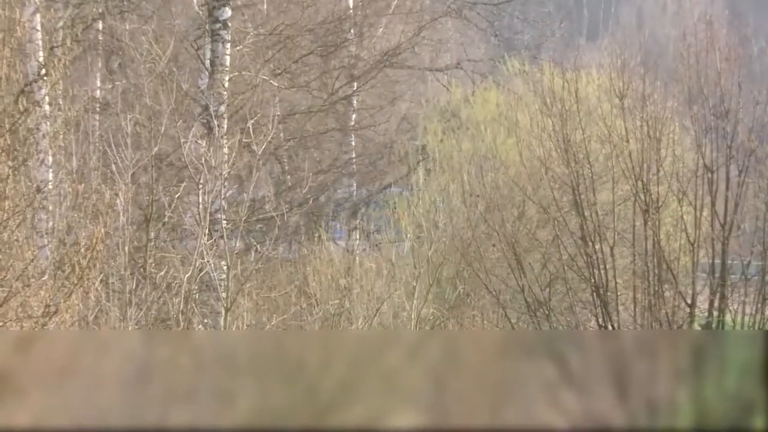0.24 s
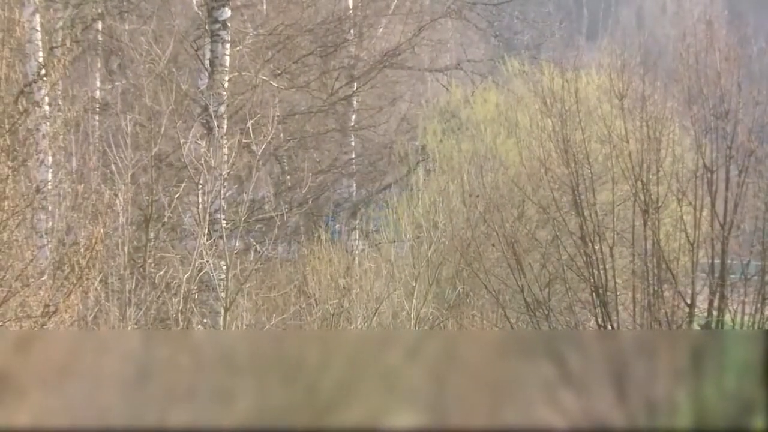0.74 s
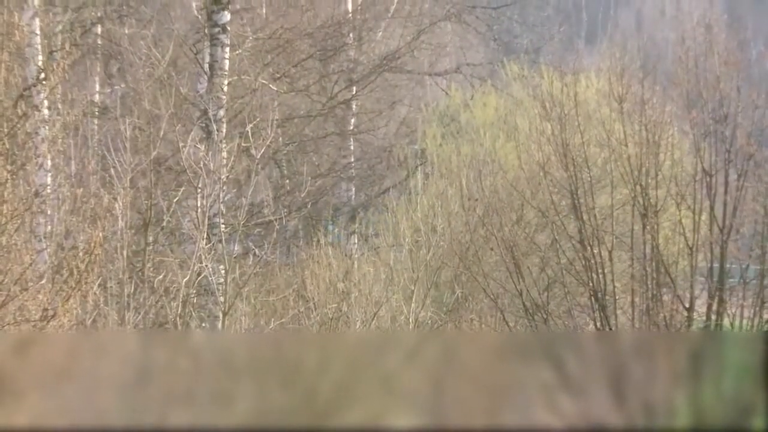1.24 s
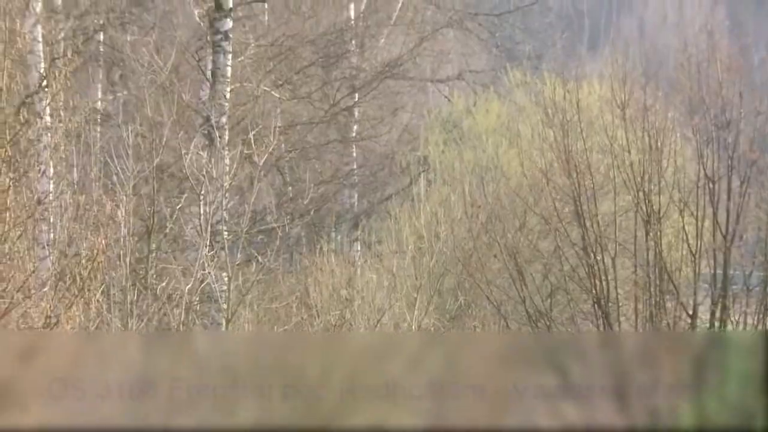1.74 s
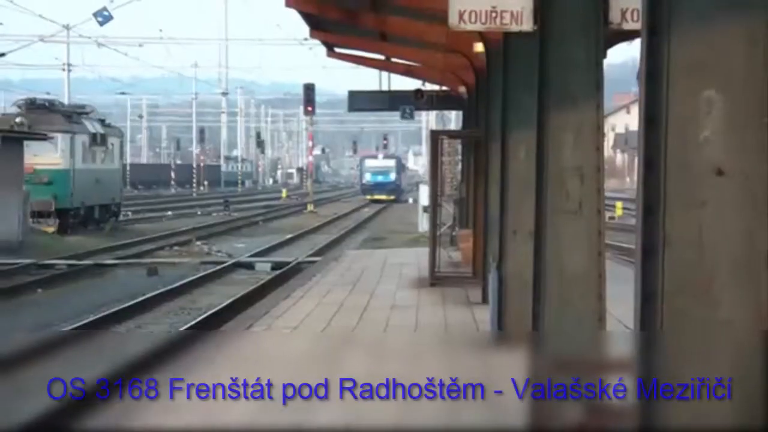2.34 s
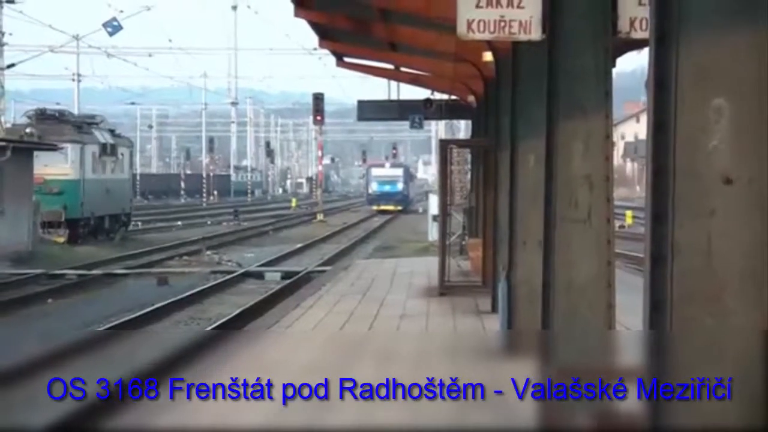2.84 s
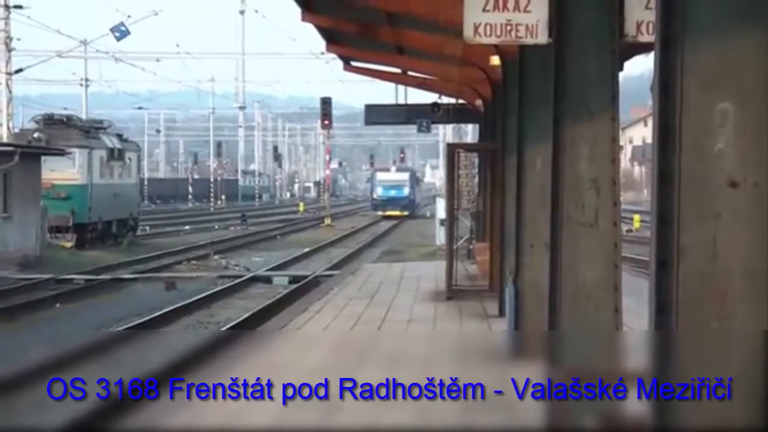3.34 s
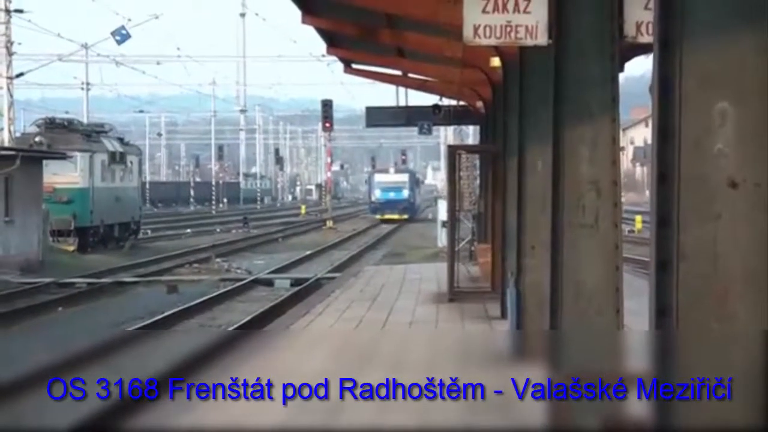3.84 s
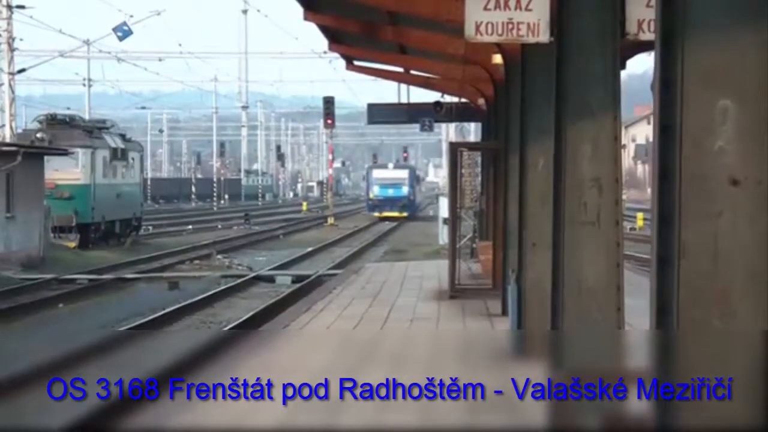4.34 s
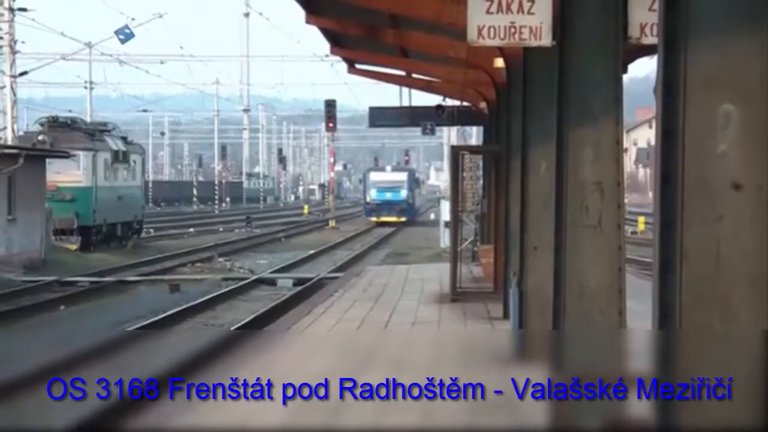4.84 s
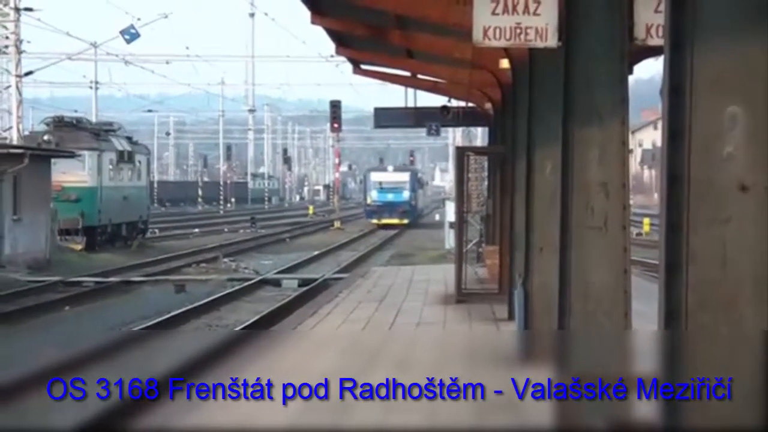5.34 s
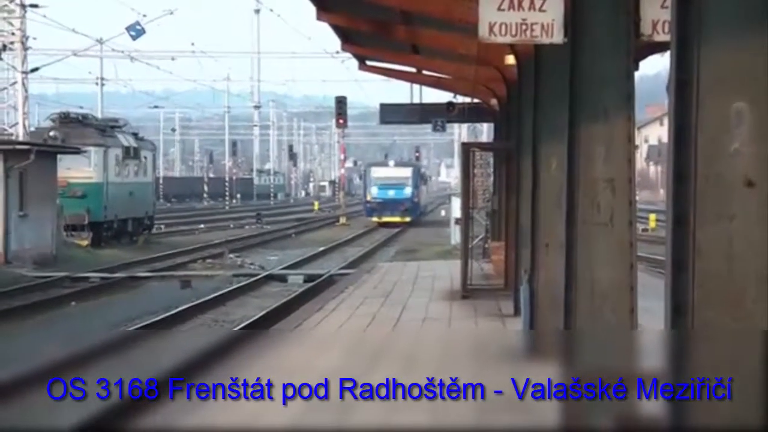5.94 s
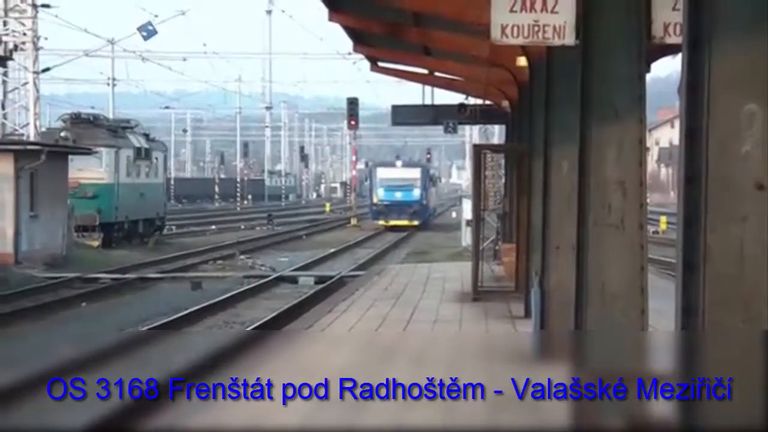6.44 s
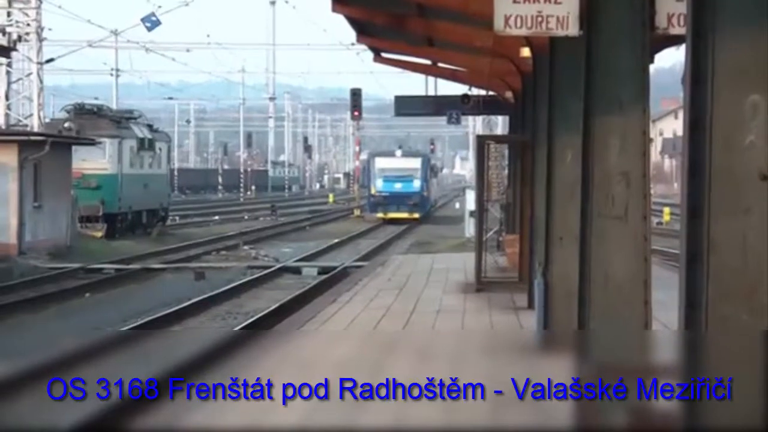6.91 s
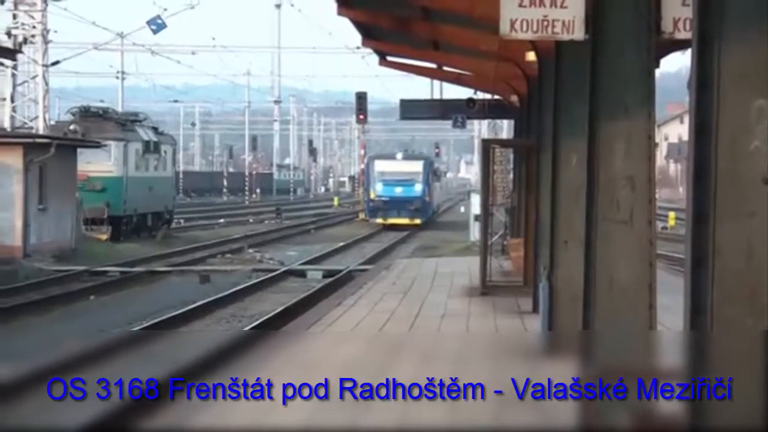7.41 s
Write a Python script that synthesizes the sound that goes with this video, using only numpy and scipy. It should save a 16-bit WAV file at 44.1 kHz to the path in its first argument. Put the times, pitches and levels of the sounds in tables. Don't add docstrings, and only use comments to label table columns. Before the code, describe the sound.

Two scenes joined by a hard cut. First, under two seconds of very quiet woodland: hissing microphone, dull distant rolling, uneven soft wheel thuds, tiny birds and dry ticks. Then a big diesel engine idles close by at a platform, even and fast, with hard metallic knocks over low roar and bright clatter, steady whines beneath, growing slightly fuller in the bass as the train approaches until the end.

```python
import sys
import numpy as np
from scipy import signal
from scipy.fft import irfft
from scipy.io import wavfile
from scipy.ndimage import uniform_filter1d

SR = 44100
rng = np.random.default_rng(int(sys.argv[2]) if len(sys.argv) > 2 else 0)


def store_wav(level_fs):
    pcm = np.round(np.clip(np.atleast_2d(level_fs), -1, 1) * 32767)
    wavfile.write(sys.argv[1], SR, pcm.T.astype(np.int16))


def linear_from_db(decibels):
    return 10 ** (np.asarray(decibels, float) / 20)


N = 338247
WOODS_END_S, PLATFORM_S, FADE_S = 1.8825, 1.9485, 0.008
CYCLE_HZ = 6.668
BLOCK_HZ, BLOCK_WIDTH_HZ = 690, 95

ORDERS = [6, 12, 24, 60, 64, 90, 97, 100, 101, 102, 103, 104, 108, 112, 114, 121, 135, 136, 144, 154, 156,
          159, 170, 255, 267, 284, 286, 292, 299, 306]


def evened(x):
    return x / np.sqrt(np.mean(x ** 2) + 1e-20)


def read(points, hz):
    f, value = np.transpose(points)
    return np.interp(np.log(hz + 1), np.log(f + 1), value)


def add(mix, start_s, sound):
    part = mix[round(start_s * SR):][:len(sound)]
    part += sound[:len(part)]


def drift(top_hz):
    t = np.arange(0, N + 256, 256) / SR
    slow = 0
    for hz in top_hz * np.geomspace(0.06, 1, num=24):
        slow = slow + np.sin(2 * np.pi * (hz * t + rng.random())) / np.sqrt(hz)
    return np.interp(np.arange(N), t * SR, evened(slow))


def noise(gain, patchy_db, count=1):
    frames, hz = N // 512 + 5, np.fft.rfftfreq(2048, 1 / SR)
    patches = uniform_filter1d(rng.standard_normal((frames, 1025)), 8, 0)
    patches = evened(uniform_filter1d(patches, 16, 1)).T
    a, b = np.moveaxis(rng.standard_normal((frames, 1025, count, 2)), -1, 0)
    z = (a + 1j * b).T * gain(hz)[:, None] * linear_from_db(patchy_db * patches)
    return signal.istft(z, nperseg=2048, noverlap=1536)[1][:, :N]


def microphone_hiss():
    # pitch_hz, level_db [dB per Hz]
    hiss_colour = [(5, 1.5), (19, -0.5), (40, -17), (70, -14), (150, -24), (442, -28), (2000, -29.5),
                   (9770, -33), (15200, -33)]
    return linear_from_db(-64.5) * evened(noise(lambda hz: linear_from_db(read(hiss_colour, hz)), patchy_db=-0.5, count=2))


def far_train():
    # pitch_hz, level_db [dB per Hz]
    far_colour = [(71, -37), (120, -7), (231, -8.5), (359, 0), (607, 0.5), (1110, -7), (1350, -12.5),
                  (1940, -11), (2140, -18), (2650, -15), (6000, -35), (7800, -56), (13200, -120)]
    # start_s, level_db [peak dB]
    joint_hits = [(0.116, -51.5), (0.155, -53), (0.297, -51), (0.36, -62), (0.544, -58), (0.875, -57),
                  (0.967, -53), (1.053, -53), (1.109, -51), (1.135, -49), (1.281, -46), (1.359, -58),
                  (1.54, -49), (1.708, -49)]
    rolling = noise(lambda hz: linear_from_db(read(far_colour, hz)), patchy_db=1.5)[0]
    train = linear_from_db(-62.5) * evened(rolling * linear_from_db(0.41 * drift(top_hz=13.2)))

    joint_hz, fall_s, attack_s = 590, 0.032, 0.004
    t = np.arange(8000) / SR
    envelope = np.minimum(t / attack_s, 1) * np.exp(-(t / fall_s) ** 2)
    rail = signal.butter(3, [0.38 * joint_hz, 1.9 * joint_hz], "band", fs=SR, output="sos")
    for start_s, level_db in joint_hits:
        thud = signal.sosfilt(rail, rng.standard_normal(8000))
        add(train, start_s, linear_from_db(level_db - 7) * evened(thud) * envelope)
    return train


def twigs():
    # start_s, level_db [peak dB], pitch_hz
    twig_ticks = [
        (.197, -64, 4000),
        (.46, -58, 2200),
        (.4603, -59, 4300),
        (.59, -66, 4800),
        (1.365, -62, 5000),
        (1.4708, -53, 7800),
        (1.4712, -56, 4000),
        (1.828, -57, 2200),
    ]
    ticking = np.zeros(N)
    t = np.arange(200) / SR
    for start_s, level_db, pitch_hz in twig_ticks:
        add(ticking, start_s, linear_from_db(level_db) * np.sin(2 * np.pi * pitch_hz * t) * np.exp(-t * pitch_hz / 3))
    return ticking


def note(length_s, start_hz, end_hz, level_db, waver):
    glide_s = 0.022
    t = np.arange(0, length_s, 1 / SR)
    hz = end_hz + (start_hz - end_hz) * np.exp(-t / glide_s)
    hz *= 1 + waver * evened(uniform_filter1d(rng.standard_normal(9000), 90))[:len(t)]
    leaves = 1 + 0.45 * evened(uniform_filter1d(rng.standard_normal(9000), 150))[:len(t)]
    level = linear_from_db(level_db + 2 - 2 * t / length_s) * signal.windows.tukey(len(t), 0.2)
    return level * leaves * np.sin(2 * np.pi * np.cumsum(hz) / SR)


def birds():
    # start_s, length_s, pitch_hz, level_db
    whistles = [
        (.485, .04, 2670, -75),
        (.595, .11, 3870, -75),
        (.955, .18, 2610, -75),
        (.95, .05, 4500, -82),
        (1.13, .08, 3090, -77),
        (1.14, .04, 1985, -74),
        (1.21, .2, 1985, -77),
        (1.71, .04, 2670, -75),
    ]
    # start_s, length_s, pitch_hz, level_db
    seeps = [(.425, .06, 7800, -76), (.49, .1, 7830, -82), (.59, .035, 7830, -73), (.63, .15, 7750, -83),
             (.6, .08, 12800, -84), (.85, .07, 7030, -81), (.88, .08, 7550, -80), (1.0, .07, 7030, -78),
             (1.01, .05, 7550, -82), (1.485, .14, 7000, -82), (1.52, .06, 7950, -82)]
    # start_s, length_s, start_hz, end_hz, level_db
    swoops = [
        (.25, .065, 6000, 3350, -76),
        (.487, .028, 1380, 1030, -64),
        (.58, .018, 5000, 4000, -80),
        (.652, .03, 1420, 1050, -63),
        (.655, .19, 2250, 1985, -71),
        (1.155, .15, 8500, 7680, -79),
    ]
    clear_waver, thin_waver = 0.005, 0.016
    calls = np.zeros(N)
    for start_s, length_s, pitch_hz, level_db in whistles:
        add(calls, start_s, note(length_s, pitch_hz, pitch_hz, level_db, clear_waver))
    for start_s, length_s, pitch_hz, level_db in seeps:
        add(calls, start_s, note(length_s, pitch_hz, pitch_hz, level_db, thin_waver))
    for start_s, length_s, start_hz, end_hz, level_db in swoops:
        add(calls, start_s, note(length_s, start_hz, end_hz, level_db, clear_waver))
    return calls


def woods():
    pan_db = 3.0 - 1.8 * np.minimum(np.arange(N) / SR, WOODS_END_S)
    outdoors = far_train() + birds() + twigs()
    return outdoors * linear_from_db([pan_db / 2, -pan_db / 2]) + microphone_hiss()


def crank():
    cycle_start_s, hunting_s = 2.0, 0.00017
    return (np.arange(N) / SR - cycle_start_s + hunting_s * drift(top_hz=1.1)) * CYCLE_HZ


def each_cycle(lines, cycles):
    size = 2 ** 16
    return np.interp(cycles % 1 * size, np.arange(size), irfft(lines, size) * size)


def whines():
    # pitch_hz, left_db, right_db
    whine_tones = [
        (72.1, -37, -37),
        (504.8, -41, -41),
        (703.1, -42, -42),
        (9001, -70, -67),
        (12207, -78, -70),
        (13025, -73, -72),
        (13255, -81, -81),
    ]
    t = np.arange(N) / SR
    total = np.zeros((2, N))
    for pitch_hz, left_db, right_db in whine_tones:
        level = np.sqrt(2) * linear_from_db([[left_db], [right_db]] + 2.8 * drift(top_hz=4.8))
        total += level * np.sin(2 * np.pi * pitch_hz * t + 1.03 * drift(top_hz=3))
    return total


def layer(colour, cycles, patchy_db, throb):
    # pitch_hz, share [0-1]
    repeats = [(40, .1), (200, .15), (450, .3), (700, .5), (1000, .7), (1400, .6), (2100, .72), (3000, .45),
               (4000, .2), (6000, .02)]
    # pitch_hz, level_db
    side_db = [(40, -17), (70, -23), (200, -34), (380, -34), (690, -22), (1280, -14), (2360, -13),
               (4360, -10.5), (6500, -4), (10000, -4), (13000, 0)]
    hz = np.arange(2400) * CYCLE_HZ

    def share(f):
        return np.clip(read(repeats, f), 0, 1)

    def mid_gain(f):
        return linear_from_db(read(colour, f))

    def side_gain(f):
        return mid_gain(f) * linear_from_db(read(side_db, f))

    a, b = rng.standard_normal((2, 2, 2400))
    ringing = np.union1d(ORDERS, np.flatnonzero(abs(hz - BLOCK_HZ) < BLOCK_WIDTH_HZ))
    a[0, ringing] = b[0, ringing] = 0
    firing = 1 + throb * np.cos(2 * np.pi * 12 * cycles)
    out = []
    for k, gain in enumerate((mid_gain, side_gain)):
        lines = (a[k] + 1j * b[k]) * gain(hz) * np.sqrt(share(hz) * CYCLE_HZ) / 2
        taps = each_cycle(lines, cycles)
        rush = noise(lambda f: gain(f) * np.sqrt(1 - share(f)), patchy_db)[0]
        rush_power = np.sum(gain(hz) ** 2 * (1 - share(hz))) * CYCLE_HZ
        out.append(taps + np.sqrt(rush_power) * evened(rush * firing))
    return np.array(out) / np.sqrt(np.mean(out[0] ** 2))


def thin_treble(x, kept):
    hz, t, z = signal.stft(x, SR, nperseg=1024, noverlap=768)
    band, frame = np.arange(0, len(hz), 4), np.arange(0, len(t), 6)
    power = np.add.reduceat(np.add.reduceat(abs(z) ** 2, band, axis=0), frame, axis=1)
    rank = power.argsort(axis=1).argsort(axis=1) / len(frame)
    keep = rank >= 1 - read(kept, hz[band])[:, None]
    mask = np.kron(keep, np.ones((4, 6)))[:len(hz), :len(t)]
    return signal.istft(z * mask, SR, nperseg=1024, noverlap=768)[1][:N]


def knocks(cycles):
    # start_s [into the cycle], level_db
    blows = [
        (.038, -5),
        (.0649, -5.2),
        (.0909, -4.7),
        (.0973, -3),
        (.1302, -6.6),
    ]
    order_db = [-36, -37, -43, -44, -45, -41, -38, -41, -44, -41, -41, -38, -36, -43, -43, -41, -42, -44,
                -46, -46, -43, -38, -42, -46, -44, -48, -46, -48, -49, -47]
    hz = np.arange(400) * CYCLE_HZ
    off_tune = (hz - BLOCK_HZ) / BLOCK_WIDTH_HZ
    lines = sum(linear_from_db(level_db) * np.exp(-2j * np.pi * hz * start_s) for start_s, level_db in blows)
    lines = lines / (1 + 2j * off_tune) ** 2
    lines *= linear_from_db(-38) / np.linalg.norm(lines) / np.sqrt(2)
    lines[ORDERS] *= linear_from_db(order_db) / abs(lines[ORDERS]) / np.sqrt(2)
    scatter = 0.2 * off_tune ** 2
    lines *= np.exp(1j * scatter * rng.standard_normal(400))
    return each_cycle(lines, cycles) * linear_from_db(0.81 * drift(top_hz=20))


def platform():
    # pitch_hz, level_db [dB per Hz]
    exhaust_colour = [(10, -34), (25, -19), (34, -8), (50, 2), (65, 0), (92, 0), (124, -5), (200, -4.5),
                      (260, -13), (440, -120)]
    # pitch_hz, level_db [dB per Hz]
    body_colour = [(65, -20), (110, -9), (152, -7), (242, -10.5), (275, -6), (305, -6.5), (420, -4),
                   (461, -6), (493, -7.5), (606, -5), (696, -1.5), (762, -5.5), (1040, -6.5), (1430, -12),
                   (1700, -21), (2210, -29.5), (3740, -120)]
    # pitch_hz, level_db [dB per Hz]
    clatter_colour = [(880, -24), (1550, -6.5), (2000, 1), (2550, -3.5), (2650, -6), (3250, -9.5),
                      (3600, -2), (4050, -6.5), (4300, -10.5), (4700, -8), (5350, -13), (6100, -23.5),
                      (11300, -31.5), (11700, -33.5), (15200, -41)]
    # pitch_hz, share [0-1]
    kept_mid = [(7000, 1), (11400, .92), (11600, .35), (12800, .2), (13100, .55), (15000, .5)]
    kept_side = [(7500, 1), (7800, .45), (9000, .25), (10500, .08), (11300, .01), (12800, .04),
                 (13500, .35), (15000, .5)]

    cycles = crank()
    nearer_db = 0.48 * (np.arange(N) / SR - PLATFORM_S)
    exhaust_db = -32 + nearer_db - drift(top_hz=3.2)
    body_db = -23 + 0.22 * nearer_db
    clatter_db = -27.5 + 0.081 * nearer_db
    exhaust = linear_from_db(exhaust_db - 2.5) * layer(exhaust_colour, cycles, patchy_db=2.0, throb=0.01)
    body = linear_from_db(body_db - 2.0) * layer(body_colour, cycles, patchy_db=0.34, throb=0.024)
    clatter = linear_from_db(clatter_db) * layer(clatter_colour, cycles, patchy_db=1.23, throb=0.039)
    mid, side = exhaust + body + clatter
    ring = knocks(cycles) * linear_from_db(0.47 * (nearer_db - nearer_db.mean()))
    mid = thin_treble(mid, kept_mid) + ring
    side = thin_treble(side, kept_side)
    return np.array([mid + side, mid - side]) + whines()


def scene():
    t = np.arange(N) / SR
    fade_in = np.clip((t - PLATFORM_S) / FADE_S, 0, 1) ** 1.1
    return woods() * (t < WOODS_END_S) + platform() * fade_in


def low_pass(x):
    return signal.sosfilt(signal.butter(12, 15440, fs=SR, output="sos"), x)


def record(dry):
    edge = signal.firwin(1023, 15050, window=("kaiser", 9), fs=SR)
    limited = signal.oaconvolve(dry, edge[None], "same")
    return low_pass(limited)


dry = scene()
out = record(dry)
store_wav(out)
```